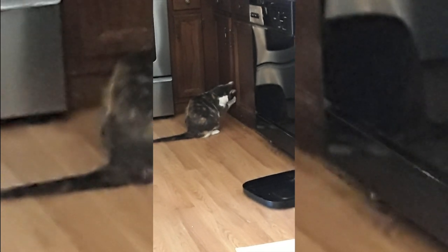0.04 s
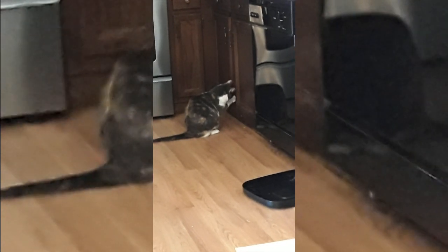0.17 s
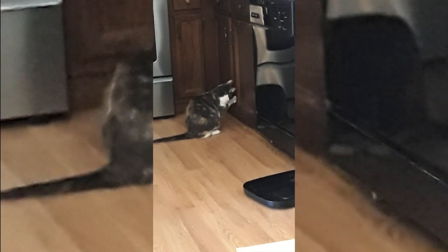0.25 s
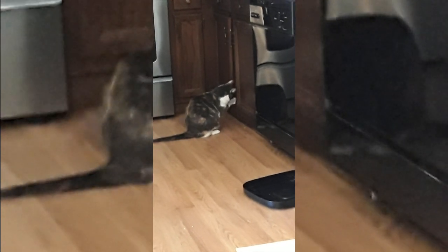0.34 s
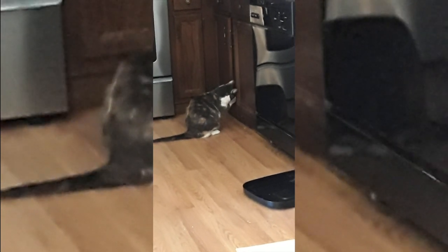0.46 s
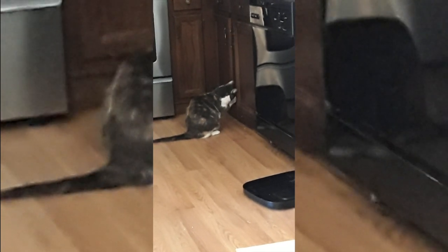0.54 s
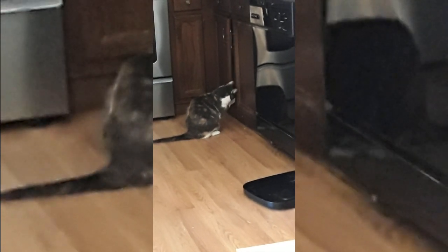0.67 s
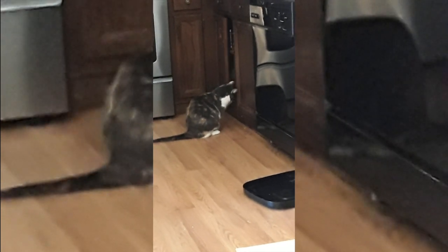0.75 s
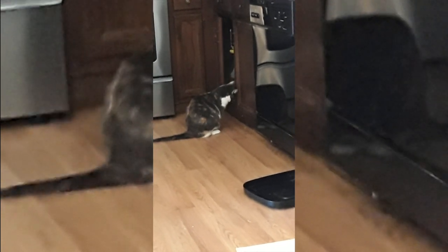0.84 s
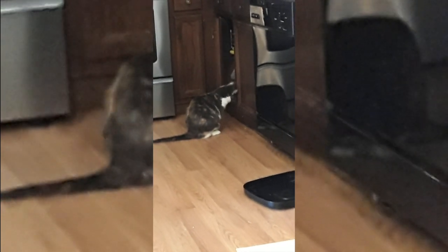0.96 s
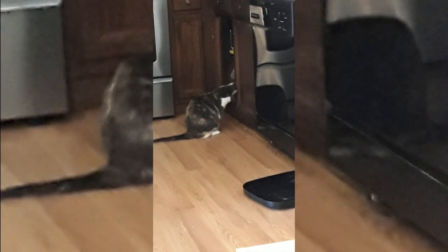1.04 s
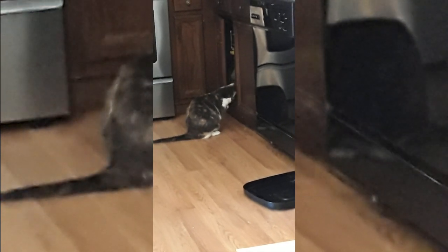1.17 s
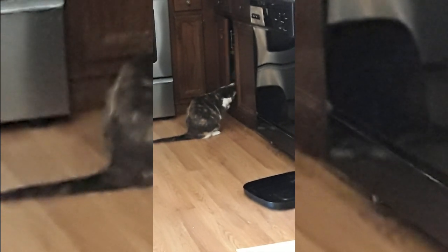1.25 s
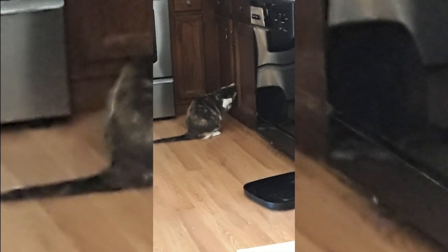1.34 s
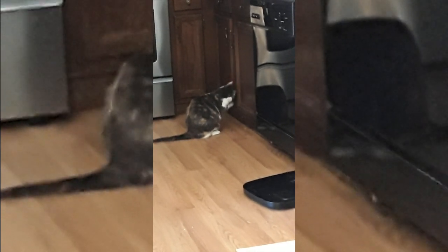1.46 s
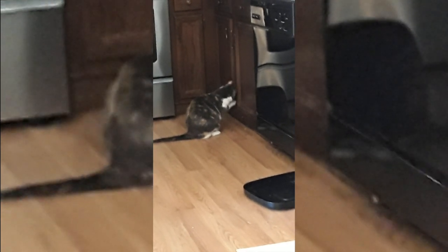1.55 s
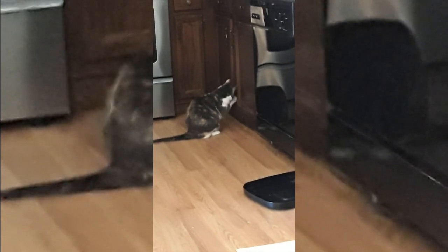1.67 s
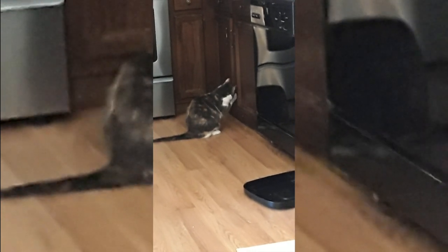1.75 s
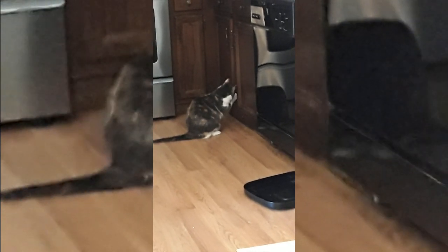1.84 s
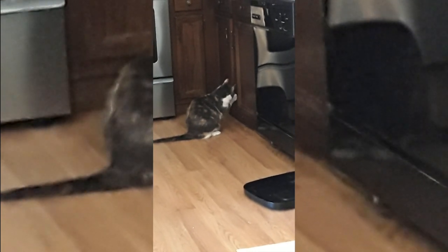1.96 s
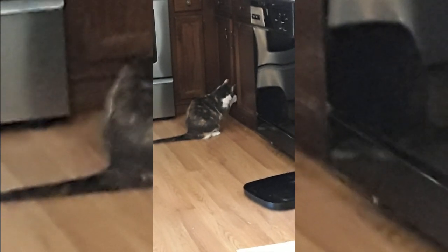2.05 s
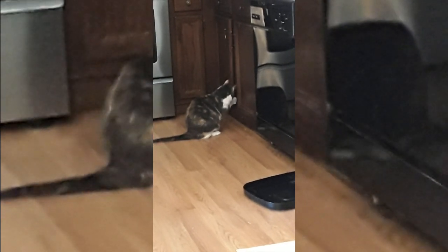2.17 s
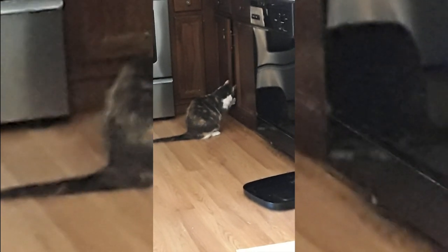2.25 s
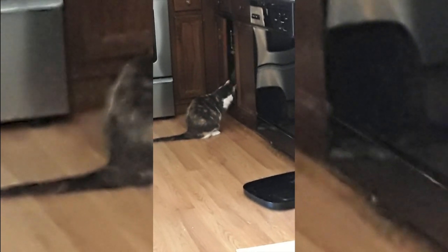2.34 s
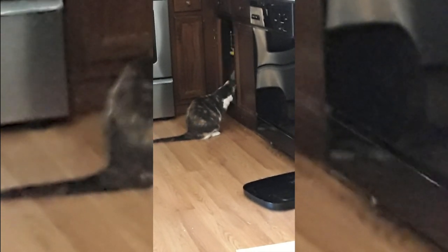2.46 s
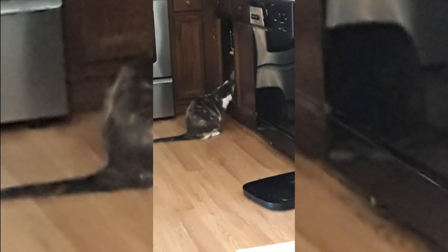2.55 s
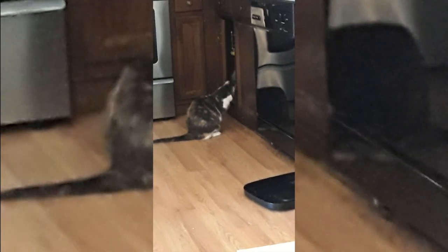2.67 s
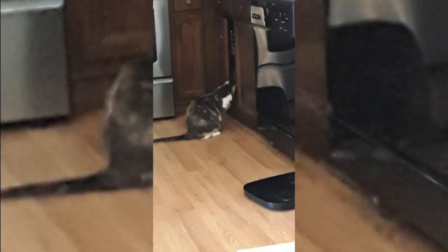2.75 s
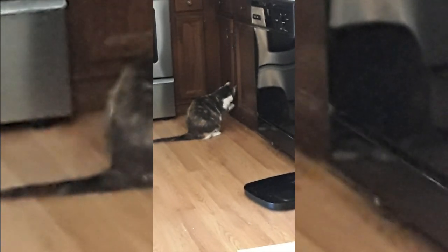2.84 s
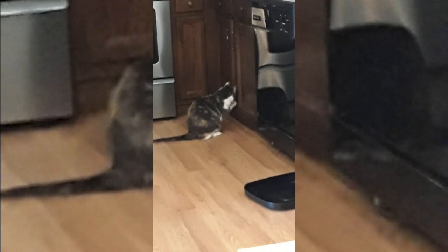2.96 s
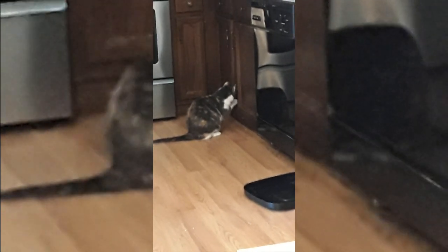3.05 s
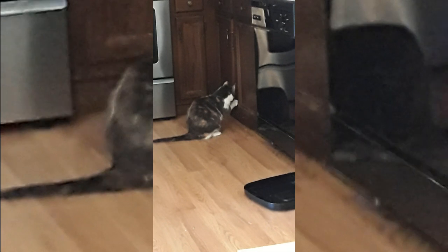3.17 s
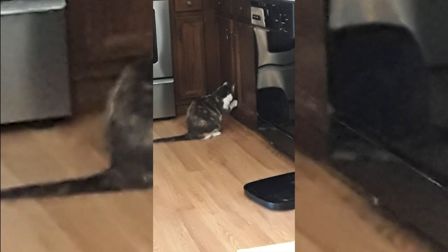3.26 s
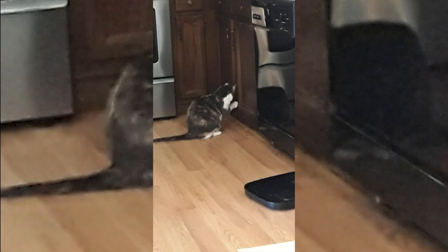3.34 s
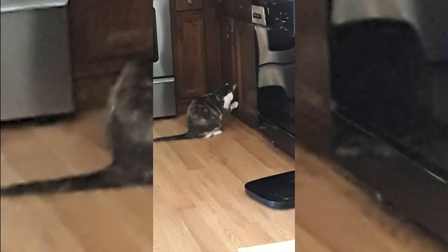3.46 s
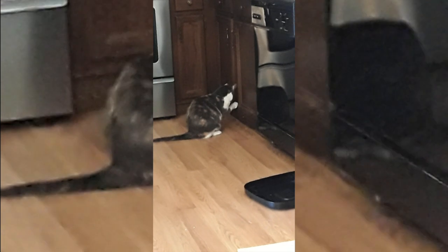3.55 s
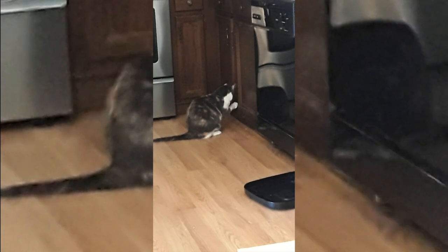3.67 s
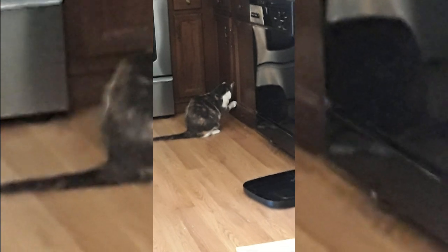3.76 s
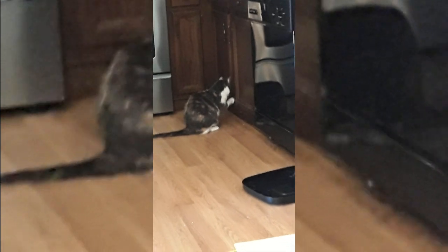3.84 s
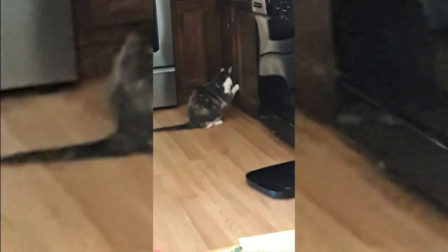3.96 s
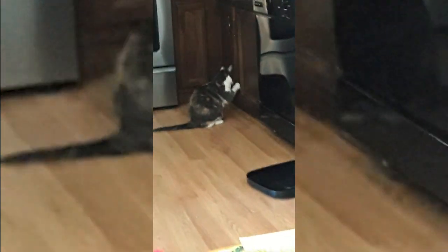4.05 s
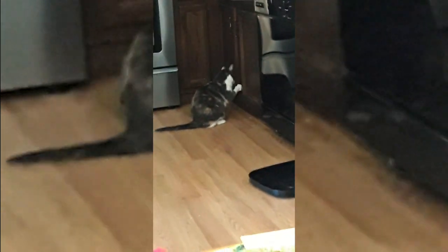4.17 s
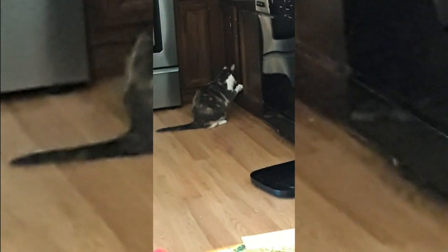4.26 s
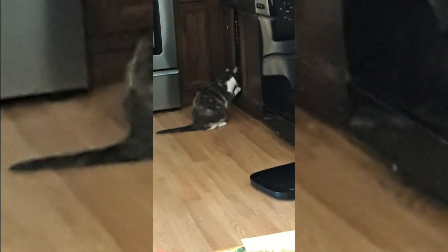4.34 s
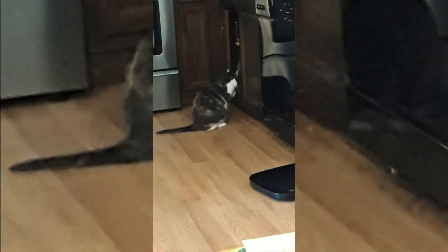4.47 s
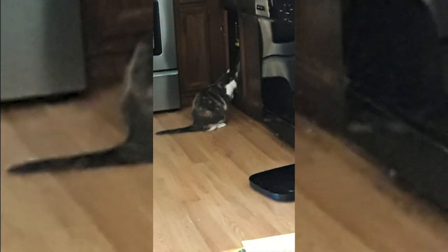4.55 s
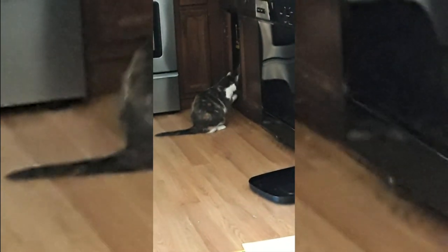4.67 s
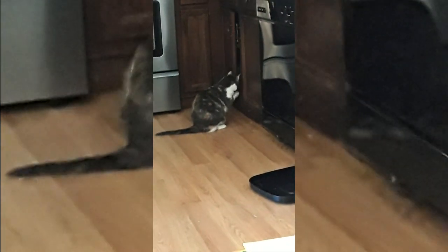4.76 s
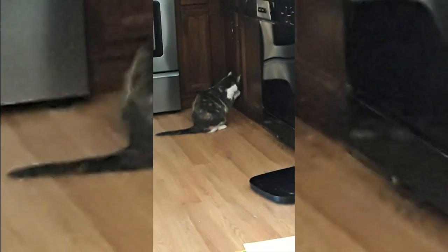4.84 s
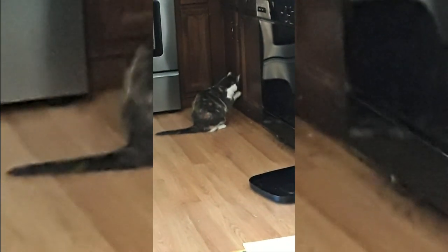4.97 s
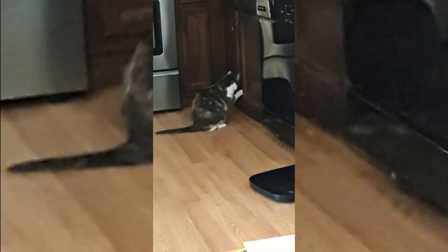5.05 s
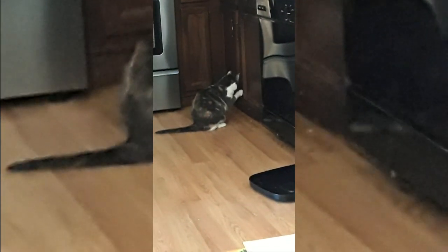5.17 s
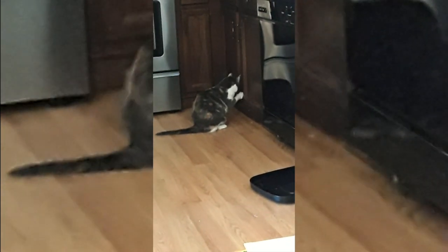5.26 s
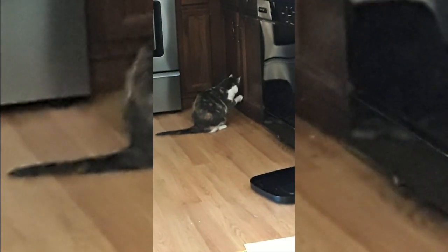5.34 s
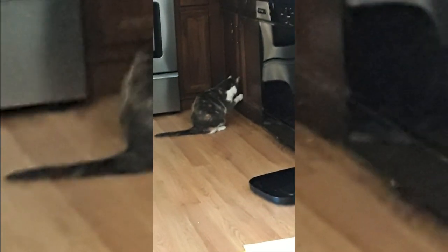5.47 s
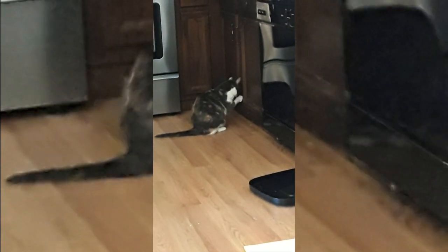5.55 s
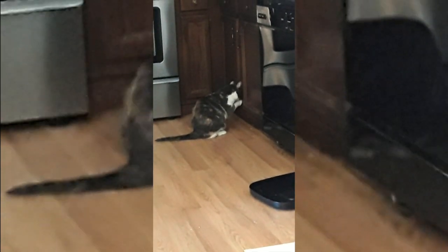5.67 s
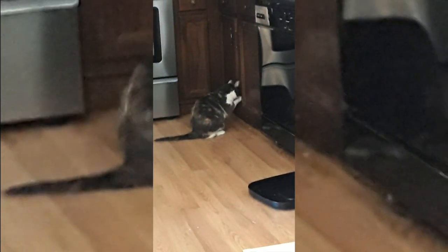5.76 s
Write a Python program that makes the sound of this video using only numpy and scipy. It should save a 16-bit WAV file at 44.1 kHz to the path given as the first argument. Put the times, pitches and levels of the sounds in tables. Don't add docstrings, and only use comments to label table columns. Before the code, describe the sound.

In a quiet kitchen, faint paw and claw scuffs on wood lead to a loud cabinet door slam, which rebounds with softer knocks. Two more slams follow at uneven gaps, each with a quick bounce. Each has a sharp crack, woody ring and low boom, with a short hard room echo. Low appliance drone and faint stereo microphone hiss lie beneath.

```python
import sys
import numpy as np
from scipy import signal
from scipy.fft import rfft, irfft
from scipy.io import wavfile

SR = 44100
rng = np.random.default_rng(int(sys.argv[2]) if len(sys.argv) > 2 else 0)


def unload_audio(sound):
    columns = np.transpose(np.atleast_2d(sound))
    steps = np.round(np.clip(columns, -1, 1) * 32767)
    wavfile.write(sys.argv[1], SR, steps.astype(np.int16))


def gain_from_decibels(decibels):
    exponent = np.asarray(decibels, float) / 20
    return 10 ** exponent


N = 256220

# (frequency [Hz], side minus mid [dB])
AMBIENT_SIDE = [(60, -20.5), (110, -30), (200, -24), (380, -11.5), (700, -9.5), (1290, -7), (2380, -7.5),
                (4400, -5), (8120, -5.5), (15000, -8)]


def rms_one(x):
    return x / np.sqrt(np.mean(x ** 2) + 1e-20)


def at_hz(points, hz):
    table_hz, value = np.array(points).T
    return np.interp(np.log(np.maximum(hz, 1)), np.log(table_hz), value)


def coloured(spectrum, side, size):
    hz = np.fft.rfftfreq(size, 1 / SR)
    side_gain = np.array([np.ones_like(hz), gain_from_decibels(at_hz(side, hz))])
    return rfft(rng.standard_normal((2, size))) * gain_from_decibels(at_hz(spectrum, hz)) * side_gain, hz


def left_right(mid_side):
    return np.array([[1, 0.83], [1, -0.79]]) @ mid_side


def steady_noise(spectrum):
    spectra, _ = coloured(spectrum, AMBIENT_SIDE, N)
    return rms_one(left_right(irfft(spectra, N)))


def drift(rate_hz):
    steps = int(N / SR * rate_hz) + 2
    return np.interp(np.arange(N) / SR * rate_hz, np.arange(steps), rng.standard_normal(steps))


def ring(clicks, hz, t60_s):
    r, w = gain_from_decibels(-60 / (t60_s * SR)), 2 * np.pi * hz / SR
    return signal.lfilter([0, np.sin(w)], [1, -2 * r * np.cos(w), r * r], clicks + 1e-18)


def resonance(x, hz, width_hz):
    r = np.exp(-np.pi * width_hz / SR)
    feed = np.array([1, 0, -1]) * (1 - r * r) / 2
    return signal.lfilter(feed, [1, -2 * r * np.cos(2 * np.pi * hz / SR), r * r], x)


def microphone_hiss():
    # (frequency [Hz], level [dB per Hz])
    hiss_spectrum = [(300, -11.5), (1000, -7), (3500, -9), (9500, -12), (11000, -6), (11700, 0),
                     (12800, 0.5), (13800, 0), (14900, -9), (15900, -8)]
    return gain_from_decibels(-67) * steady_noise(hiss_spectrum)


def house():
    # (frequency [Hz], level [dB per Hz])
    drone_spectrum = [(15, -60.5), (25, -33.5), (64, -18.5), (100, -11), (136, 0), (166, -8.5), (223, -7),
                      (249, -12.5), (290, -6), (340, -16.5), (430, -23.5), (860, -33.5), (1500, -42.5),
                      (3000, -53)]
    level_db, flutter_db = -56, 2
    return steady_noise(drone_spectrum) * gain_from_decibels(level_db + flutter_db * drift(6.5))


def paws():
    # (start [s], length [s], rub level [dB], rub pitch [Hz], claw level [dB])
    scuffs = [(-.05, .1, -66, 2100, -75), (0.258, 0.051, -82, 2500, -73.5), (0.478, .05, -82, 5000, -79),
              (0.733, .06, -67, 4100, -69), (1.057, .008, -71, 3700, -87), (1.699, .069, -70, 2400, -74),
              (1.92, .072, -76, 2600, -86), (2.07, .08, -79, 2700, -75), (2.333, .03, -77, 5000, -68),
              (3.14, .16, -70, 2600, -74), (3.939, 0.049, -71.5, 5010, -75), (4.107, .07, -69, 1750, -75),
              (4.408, .12, -84, 2100, -73), (5.17, .13, -68, 1900, -75), (5.388, .06, -69, 3400, -68),
              (5.629, .05, -83, 2600, -79), (5.771, 0.033, -71, 1700, -85.5)]
    # (frequency [Hz], width [Hz])
    scuff_colours = [(1740, 210), (2200, 320), (3000, 900), (4000, 600), (5300, 1800), (6650, 260)]
    rough_db, t60_s, top_hz = 2.5, 0.35, 7100
    rise_share = 0.3
    rub_fall_db_per_octave, claw_fall_db_per_octave = 15, 30
    control_step = 32

    friction = left_right(rng.standard_normal((2, N)) * [[1], [.35]]) * gain_from_decibels(rough_db * drift(51))
    start_s, length_s, rub_db, rub_hz, claw_db = np.transpose(scuffs)[:, :, None]
    since_s = np.maximum(np.arange(0, N, control_step) / SR - start_s, 0)
    rise = 1 - np.exp(-since_s / (rise_share * length_s))
    strokes = rise * gain_from_decibels(-60 * np.maximum(since_s - length_s, 0) / t60_s)
    claw_hz = scuff_colours[-1][0]
    out = 0
    for hz, width_hz in scuff_colours:
        rub = gain_from_decibels(rub_db - rub_fall_db_per_octave * abs(np.log2(hz / rub_hz)))
        claw = gain_from_decibels(claw_db - claw_fall_db_per_octave * abs(np.log2(hz / claw_hz)))
        level = np.repeat((np.hypot(rub, claw) * strokes).sum(axis=0), control_step)[:N]
        out = out + level * rms_one(resonance(friction, hz, width_hz))
    return signal.sosfilt(signal.butter(6, top_hz, fs=SR, output="sos"), out)


def kitchen_echo():
    # (frequency [Hz], level [dB per Hz])
    echo_spectrum = [(24, -63), (60, -40.5), (140, -16.5), (210, -14.5), (367, -14), (600, -10.5),
                     (1230, -13.5), (2200, -15), (4020, -18), (6830, -22.5), (7300, -24), (7900, -35),
                     (12500, -29.5), (14500, -34.5), (16000, -45.5)]
    # (frequency [Hz], side minus mid [dB])
    echo_side = [(60, -19.5), (110, -40.5), (200, -24.5), (380, -9), (700, -12.5), (1290, -7), (2380, -9),
                 (4400, -8.5), (8120, -9), (15000, -9)]
    # (frequency [Hz], time constant [s])
    echo_rise = [(100, 0.008), (1000, 0.014), (4000, 0.0078), (8000, 0.0038)]
    # (frequency [Hz], t60 [s])
    echo_t60 = [(60, 1), (200, 0.98), (600, 0.53), (1500, 0.54), (3000, 0.48), (6000, 0.53), (7400, .44),
                (8000, 0.44), (12000, 0.37), (15500, 0.22)]
    early_db, early_t60_s = -5, 0.12
    late_loss_db, late_s = 3.5, 0.34

    size = SR
    spectra, hz = coloured(echo_spectrum, echo_side, size)
    t, echo = np.arange(size) / SR, 0
    octave = np.log2(np.maximum(hz, 1))
    for centre in np.arange(5, 14.5, .5):
        band = irfft(spectra * np.clip(1 - 2 * abs(octave - centre), 0, 1), size)
        rise = 1 - np.exp(-t / at_hz(echo_rise, 2 ** centre))
        echo = echo + band * rise * gain_from_decibels(-60 * t / at_hz(echo_t60, 2 ** centre))
    scale = np.std(irfft(spectra[0], size))
    early = 1 + gain_from_decibels(early_db - 60 * t / early_t60_s)
    late = gain_from_decibels(-late_loss_db * (t / late_s) ** 4)
    return left_right(echo) / scale * early * late


def closings():
    # (time [s], blow level [dB], far-edge slap [dB re blow])
    slams = [
        (1.3074, -2, -1.5),
        (2.8285, -3, 1),
        (4.7995, -3.5, -3.5),
    ]
    # (time [s], blow level [dB], panel ring, far-edge slap, boom [dB re blow])
    rebounds = [(1.468, -11, -4.5, 2, -3), (1.642, -24.5, .6, -4, -9), (1.708, -34, 9, 2.1, -6),
                (1.753, -41, -2.1, 5, 12.5), (2.984, -10.5, -2.1, .4, -5.5), (3.067, -35, .1, 3, 12),
                (3.140, -31, 3, -7, -10.1), (4.934, -13, -2.1, 4, -4.5), (4.975, -26, -11, 2.1, 4.5),
                (5.045, -28, 7, -4.5, 1.1), (5.096, -40, -6, -6, 2.1), (5.246, -35, 4.5, 6.5, 6)]
    hard_hz, panel_db, boom_db = 14000, -0.95, -2.1
    rebound_hard_hz, halves_per_db = 1950, .03

    hits = [(s, db, hard_hz, panel_db, slap_db, boom_db) for s, db, slap_db in slams]
    for s, db, *parts_db in rebounds:
        hits.append((s, db, rebound_hard_hz * 2 ** (halves_per_db * db), *parts_db))
    return hits


def contacts():
    panel_delay_s, slap_delay_s, boom_delay_s = .004, 0.033, .026
    slap_softness = .2
    forces, click = np.zeros((4, N)), np.eye(1, 900)[0]
    for s, db, hard_hz, panel_db, slap_db, boom_db in closings():
        parts = [(0, 0, 1),
                 (panel_delay_s, panel_db, 1),
                 (slap_delay_s, slap_db, slap_softness),
                 (boom_delay_s, boom_db, 1)]
        for force, (delay_s, part_db, share) in zip(forces, parts):
            r = np.exp(-2 * np.pi * max(hard_hz * share, 600) / SR)
            push = signal.lfilter([(1 - r) ** 2], [1, -2 * r, r * r], click)
            at = round((s + delay_s) * SR)
            force[at:at + 900] += gain_from_decibels(db + part_db) * push
    return forces


def air_boom(push):
    hz, split_hz, t60_s = 142.54, 14, 0.38
    return gain_from_decibels(-14.5) * (ring(push, hz - split_hz / 2, t60_s) - ring(push, hz + split_hz / 2, t60_s))


def door():
    # (frequency [Hz], level re blow [dB], level re slap [dB], t60 [s])
    door_modes = [(86, -22.5, -43.5, .35), (115, -12, -36, 0.032), (202, -29, -36.5, 0.12),
                  (241, -23.5, -26.5, 0.29), (282, -23.5, -28, .25), (327.6, -16.5, -37.5, 0.24),
                  (363, -14, -37, 0.2), (490, -19, -24, 0.31), (512, -26, -26.5, 0.21),
                  (607, -20.5, -17.5, 0.16), (748, -21, -15, 0.2), (752, -28.5, -22.5, 0.15),
                  (805, -15, -16.5, 0.21), (946, -34, -30.5, .15), (1160, -25, -35, 0.043),
                  (1276, -29.5, -35.5, 0.076), (1360, -42.5, -38, 0.13), (1424, -27.5, -24.5, 0.15),
                  (1732, -26, -37, 0.34), (1694, -29, -34.5, 0.12), (2038, -22.5, -35, 0.15)]
    echo_db, echo_slap_db, radiates_above_hz = -11, -14.5, 42

    blow, panel, slap, push = contacts()
    wood = 0
    for k, (hz, blow_db, slap_db, t60_s) in enumerate(door_modes):
        drive = gain_from_decibels(blow_db) * panel + gain_from_decibels(slap_db) * slap
        wood = wood + (-1) ** k * ring(drive, hz, t60_s)
    force = blow + gain_from_decibels(echo_slap_db) * slap
    echo = gain_from_decibels(echo_db) * signal.fftconvolve(force[None], kitchen_echo())[:, :N]
    high_pass = signal.butter(2, radiates_above_hz, "high", fs=SR, output="sos")
    return signal.sosfilt(high_pass, wood + air_boom(push) + echo)


def scene():
    return house() + paws() + door()


def top_cut(x):
    return signal.sosfilt(signal.butter(12, 16790, fs=SR, output="sos"), x)


def record(dry):
    balance_db, cutoff_hz = [[-.2], [.2]], 16150
    rounded = .9 * np.tanh((dry + microphone_hiss()) * gain_from_decibels(balance_db) / 0.7)
    mix = signal.sosfilt(signal.cheby2(16, 60, cutoff_hz, fs=SR, output="sos"), rounded)
    return top_cut(mix)


dry = scene()
out = record(dry)
unload_audio(out)
```